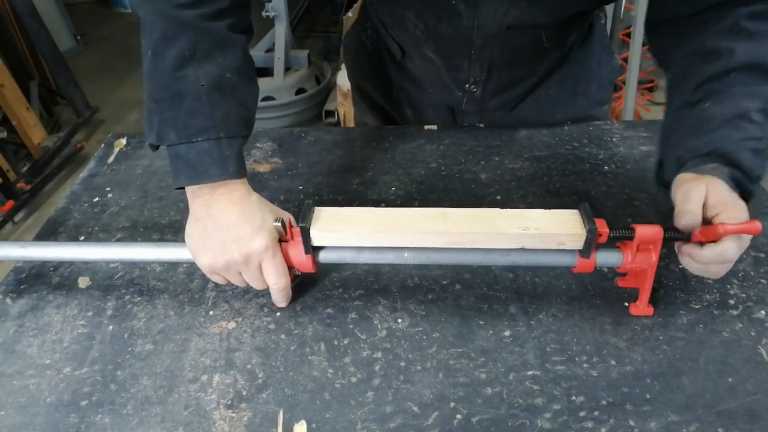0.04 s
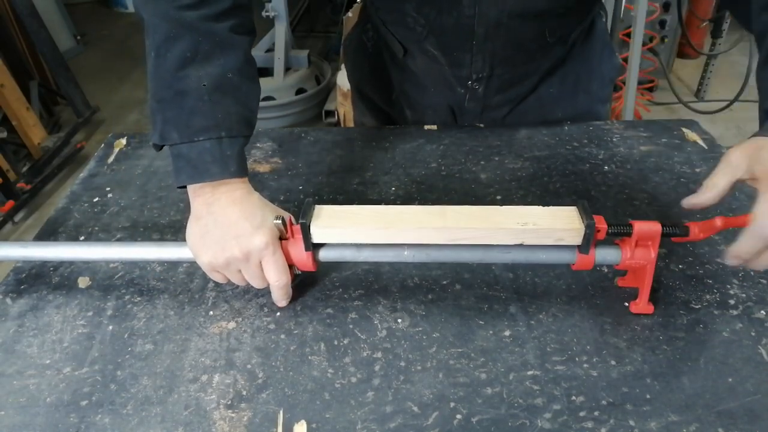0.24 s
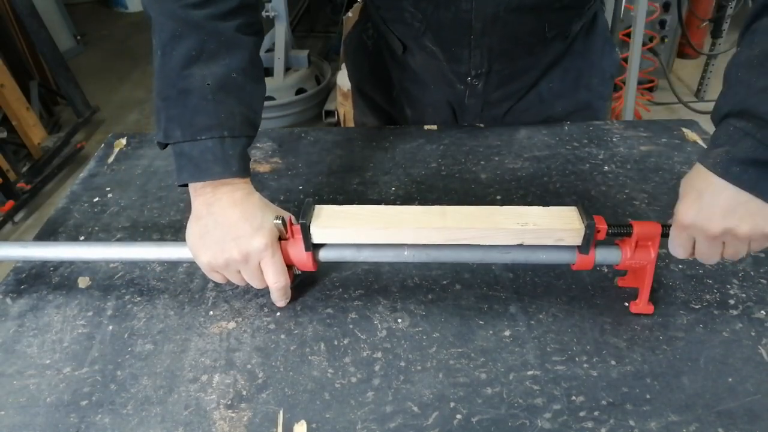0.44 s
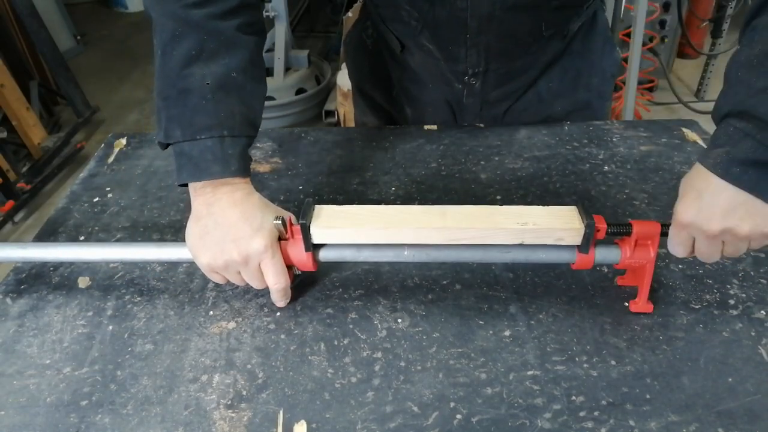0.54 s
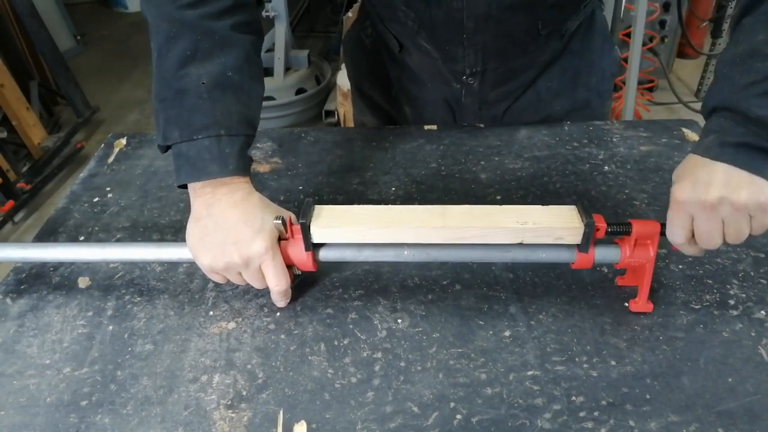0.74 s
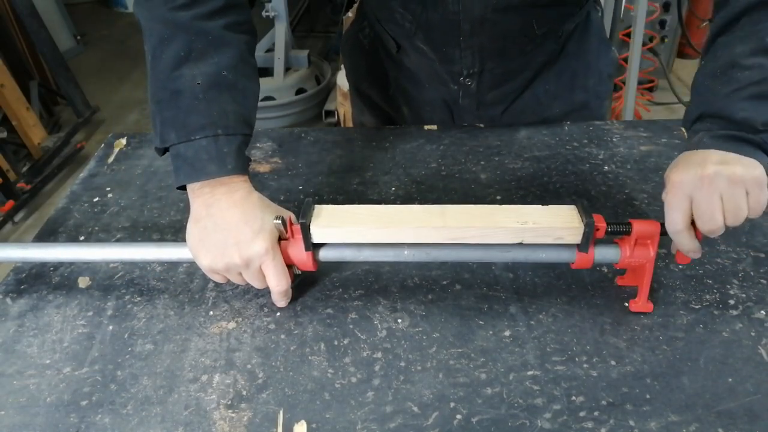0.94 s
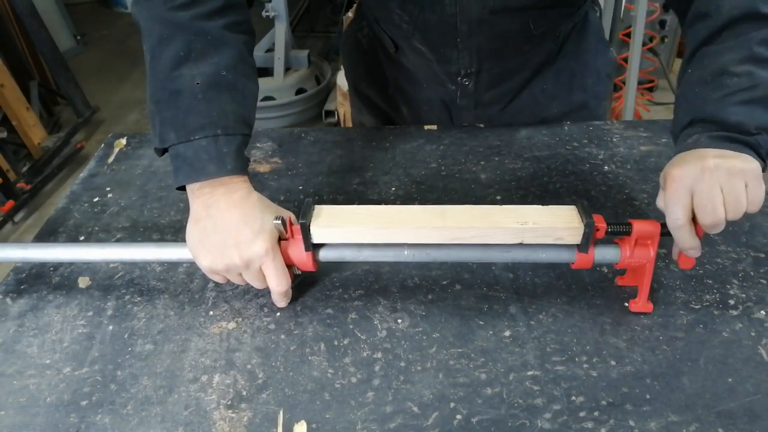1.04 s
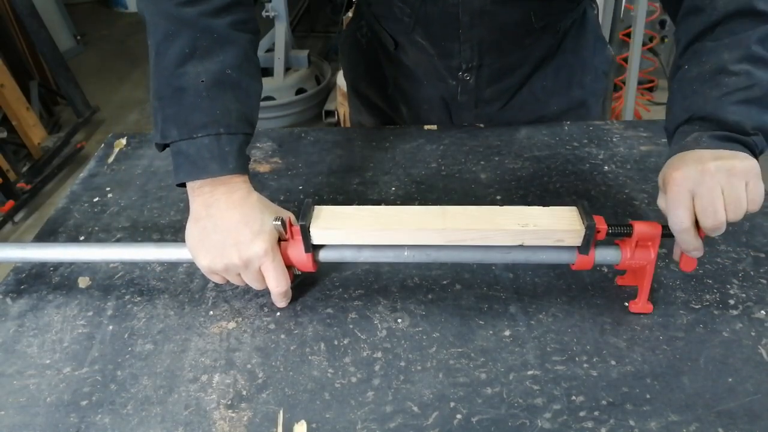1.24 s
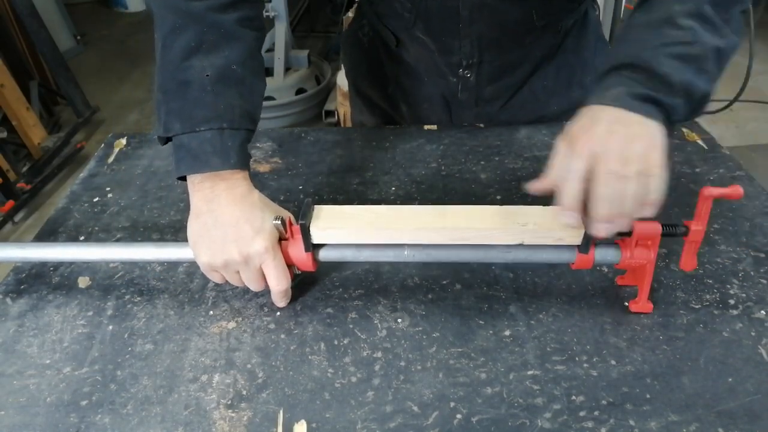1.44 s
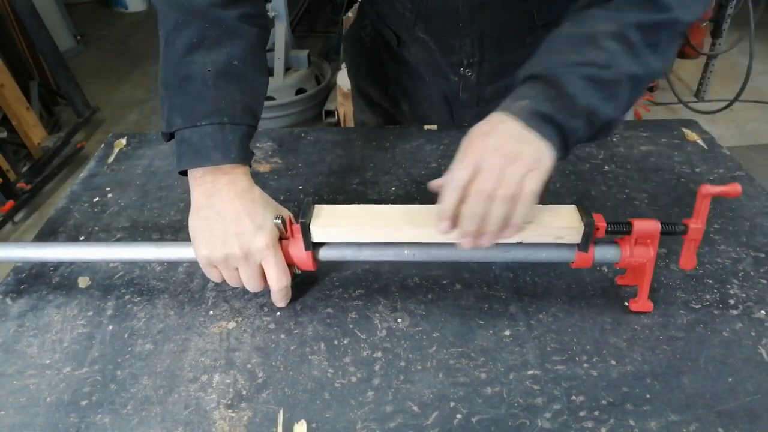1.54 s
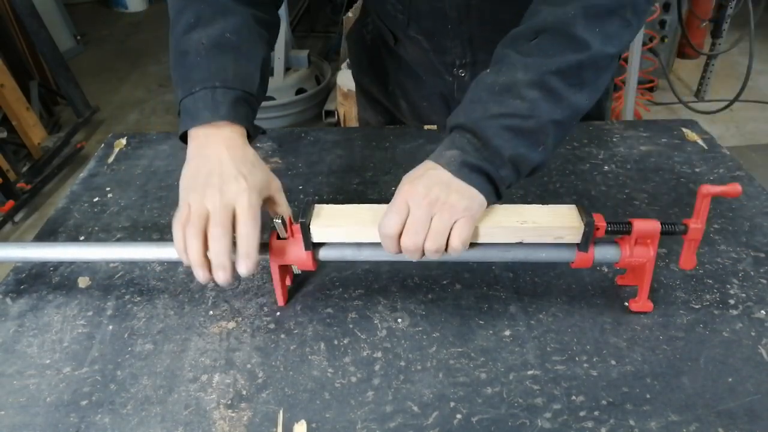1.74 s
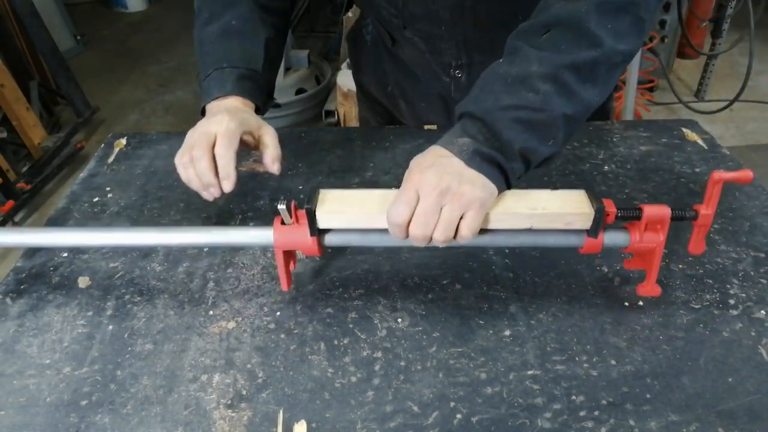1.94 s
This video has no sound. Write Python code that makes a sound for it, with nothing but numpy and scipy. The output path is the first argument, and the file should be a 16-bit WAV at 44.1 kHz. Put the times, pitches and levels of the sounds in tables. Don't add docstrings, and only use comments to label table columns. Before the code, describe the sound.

A pipe clamp rocks on a heavy workbench: one hard low clunk early, lighter rattling thuds and scraping, a quieter middle, then a second cluster of knocks; quiet workshop hum, close stereo microphone.

```python
import sys
import numpy as np
from scipy import signal
from scipy.fft import rfft, irfft, next_fast_len
from scipy.io import wavfile
from scipy.ndimage import map_coordinates

SR = 44100
rng = np.random.default_rng(int(sys.argv[2]) if len(sys.argv) > 2 else 0)


def ratio_of_db(decibels):
    return 10 ** (np.asarray(decibels, float) / 20)


def persist_wave(psi):
    counts = np.round(np.clip(psi, -1, 1) * 32767).astype(np.int16)
    wavfile.write(sys.argv[1], SR, np.atleast_2d(counts).T)


N = 88200


def unit(x):
    return x / np.sqrt(np.mean(x ** 2) + 1e-20)


def along(points, hz):
    f, v = np.transpose(points)
    return np.interp(np.log(hz + 1), np.log(f + 1), v)


def wobble(rate):
    return map_coordinates(rng.standard_normal(400), [np.arange(N) * rate / SR])


def filtered(x, response):
    m = next_fast_len(N + SR // 2)
    return irfft(rfft(x, m) * response(np.fft.rfftfreq(m, 1 / SR)), m)[..., :N]


def swells(spans, levels_db):
    t = np.arange(N) / SR
    total = 0
    for (start_s, length_s), level_db in zip(spans, levels_db):
        arch = np.sin(np.pi * np.clip((t - start_s) / length_s, 0, 1)).clip(0)
        total = total + ratio_of_db(level_db) * np.sqrt(arch)
    return total


def add_at(out, start_s, sound):
    start = round(start_s * SR)
    out[:, start:start + sound.shape[1]] += sound


# pitch_hz, likeness [-1 to 1]
DIFFUSE_LIKENESS = [(30, 1), (200, 0.72), (600, 0.36), (1500, 0), (3000, 0.067)]


def noise(gain, likeness=DIFFUSE_LIKENESS):
    def response(hz):
        angle = np.arccos(np.clip(along(likeness, hz), -1, 1)) / 2
        return gain(hz) * [np.cos(angle), np.sin(angle)]

    mid, side = filtered(rng.standard_normal((2, N)), response)
    return unit(np.array([mid + side, mid - side]))


def coloured(spectrum, likeness=DIFFUSE_LIKENESS):
    return noise(lambda hz: ratio_of_db(along(spectrum, hz)), likeness)


SCATTER_DB, DETUNE = 2, .008
SKEW_PER_KHZ = 1


def ring(modes, rise_s):
    t = np.arange(SR // 4) / SR
    hz, db, t60, pan = np.transpose(modes)[..., None]
    level, tune, skew = rng.standard_normal((3, *hz.shape))
    phase = 2 * np.pi * hz * (1 + DETUNE * tune) * t
    decay = ratio_of_db(db + SCATTER_DB * level - 60 * t / t60)
    size = decay * (1 - np.exp(-t / rise_s)) ** 2
    ears = []
    for side in (1, -1):
        offset = side * skew * SKEW_PER_KHZ * hz / 2000
        ears.append(-(size * ratio_of_db(side * pan / 2) * np.sin(phase + offset)).sum(0))
    return np.array(ears)


# start_s, level_db
BLOW_EVENTS = [
    (0.17, -42.5),
    (0.2038, -22),
    (.649, -39),
    (0.764, -33),
    (1.347, -33),
    (1.4259, -25),
    (1.5255, -33),
]
# pitch_hz, level_db, t60_s
STRUCK_SPOTS = [
    [(116, 1, .1), (211, -5.5, 0.17), (270, -0.5, 0.064), (475, -2, 0.12), (568, -2.5, .06),
     (738, 2.5, .03), (857, -22, 0.015), (1270, -10, 0.041)],
    [(127.4, 0.5, 0.13), (171.4, -4, 0.13), (215.7, -4.5, 0.17), (294.6, -2.5, 0.18), (420.5, -15.5, 0.19),
     (495, -21, 0.21), (564, -20, 0.11), (247, 5.5, .02)],
    [(136, -2, 0.15), (173, -5, 0.082), (235.6, 3.5, 0.072), (369.1, -6.5, 0.45), (481, -0.5, 0.043),
     (642, -12.5, 0.11), (680, -3, 0.029), (1230, -6, 0.018)],
    [(136.5, 1, .17), (105, -12, 0.15), (285, -4, 0.11), (294.8, -5, 0.152), (359.3, -12, .3),
     (444, -15.5, 0.14), (494, -8.5, 0.11), (650, -12.5, 0.036)],
    [(129, 8, 0.09), (293, -5.5, 0.12), (431.2, -4, 0.24), (482, -3, 0.079), (743, -16.5, 0.13),
     (772, -29, 0.13), (1166, -23, 0.19), (1106, -27, 0.29)],
    [(144, -1.5, 0.14), (222.3, -4, 0.19), (283.5, -4.5, 0.084), (435.6, -15, 0.19), (490, -7, 0.069),
     (626, -21, 0.26), (766, -11.5, 0.032), (280, 4, 0.014)],
    [(217.3, -6, 0.24), (433, -8, .18), (489, -5, 0.081), (540, -5.5, 0.046), (717, -6, .05),
     (950, -17, 0.022), (1380, -9.5, .02), (364.6, -11, 0.39)],
]
# pitch_hz, left_minus_right_db
SPOT_BALANCE = [(125, -1.5), (220, -2.5), (295, -1.5), (430, 6), (495, -1.5), (740, 1.5), (1200, 1)]
RISE_CYCLES = 0.24


def blows():
    out = np.zeros((2, N + SR))
    for (start_s, level_db), spot in zip(BLOW_EVENTS, STRUCK_SPOTS):
        hz = np.array(spot)[:, :1]
        modes = np.hstack([spot, along(SPOT_BALANCE, hz)])
        add_at(out, start_s, ratio_of_db(level_db) * ring(modes, RISE_CYCLES / hz))
    return out[:, :N]


# start_s, top_level_db, frame_level_db, clamp_level_db, block_level_db
THUD_EVENTS = [(.238, -68, -52, -38, -45), (.262, -37, -35.5, -36, -47.5), (.345, -47, -46, -46, -55.5),
               (.464, -70, -61, -64, -62.5), (.534, -47.5, -54.5, -64, -65), (.567, -44, -47, -48, -56),
               (.61, -52, -49, -74, -63), (.682, -58, -56, -60.5, -52), (.708, -40, -54, -46.5, -55),
               (.795, -57, -55, -43.5, -53.5), (.815, -54, -66, -49.5, -59), (.86, -55, -58, -54, -72),
               (.905, -57.5, -68, -51.5, -81), (.953, -55, -70, -59.5, -74), (1.050, -55, -77, -54, -69),
               (1.169, -70, -66, -68, -70), (1.2, -64, -66, -60, -66), (1.276, -66, -63, -61, -65),
               (1.319, -56, -60.5, -54, -54.5), (1.366, -42, -57, -50, -47.5),
               (1.399, -41, -51, -55, -53.5), (1.442, -35, -42.5, -46, -48.5),
               (1.474, -39.5, -45, -58, -57.5), (1.537, -35, -47.5, -50, -59),
               (1.585, -62, -50, -42, -55.5), (1.612, -48, -59, -66, -54),
               (1.652, -51, -58.5, -47.5, -55.5), (1.701, -51.5, -86, -69, -72)]
# pitch_hz, level_db, t60_s, left_minus_right_db
TOP_MODES = [(58.4, -11.5, 0.69, 6.5), (127.7, -9, 0.11, -1.5), (140.6, 3, 0.13, -1), (163, -5, 0.12, -1),
             (179.3, 5, 0.014, -4)]
FRAME_MODES = [(200, -17, 0.079, -7.5), (223.9, -0.5, 0.19, -5.5), (251.5, -6.5, 0.25, -3.5)]
CLAMP_MODES = [(264.1, -0.5, 0.14, -1.4), (291.2, -5.5, 0.071, -1.9), (347.6, -14, 0.16, -0.62),
               (290.5, -0.5, 0.021, -2.1)]
BLOCK_MODES = [(368.5, -4.5, 0.2, -0.25), (428.5, -2, 0.21, -0.52), (486.7, -1, 0.067, 2.3),
               (549.2, -9, 0.14, -1.8), (626, -10, 0.1, 0.52), (478, 6, 0.019, 0.83)]
BODY_RISES = [0.0024, 0.00057, 0.0021, 0.0009]
BODIES = (TOP_MODES, FRAME_MODES, CLAMP_MODES, BLOCK_MODES)


def thuds():
    out = np.zeros((2, N + SR))
    for start_s, *levels_db in THUD_EVENTS:
        for level_db, body, rise_s in zip(levels_db, BODIES, BODY_RISES):
            add_at(out, start_s, ratio_of_db(level_db) * ring(body, rise_s))
    return out[:, :N]


# start_s, level_db, crack_brightness_db
JAW_EVENTS = [(.1695, -54, -5.5), (.2055, -46.5, -14.5), (.219, -56, -35), (0.6501, -54, -8),
              (.7640, -53, -19), (1.319, -60.5, -16), (1.3480, -52, -11), (1.4258, -44.5, -9),
              (1.443, -46.5, -17), (1.5255, -52, -8), (1.551, -54, -6), (1.652, -53.5, -6.5)]
# pitch_hz, level_db, t60_s, left_minus_right_db
JAW_MODES = [(738.3, -4, 0.11, -8.5), (789, -15, 0.21, 2), (860, -35.5, 0.025, -6.5),
             (1053, -20, 0.31, -13), (1136, -11.5, 0.14, -2), (1346, -7, 0.039, -3.5),
             (1506, -9.5, 0.022, -4)]
# pitch_hz, level_db [per Hz]
CRACK_COLOUR = [(900, -120), (1400, 2.5), (2000, 1), (3200, -9.5), (6000, -30.5), (12000, -43.5)]
JAW_RISE_S, CRACK_T60_S = 0.00036, 0.031


def jaw_ticks():
    out, cracks, t = np.zeros((2, N + SR)), np.zeros(N), np.arange(N) / SR
    for start_s, level_db, bright_db in JAW_EVENTS:
        add_at(out, start_s, ratio_of_db(level_db) * ring(JAW_MODES, JAW_RISE_S))
        decay_db = -60 * np.abs(t - start_s) / CRACK_T60_S
        cracks += (t > start_s) * ratio_of_db(level_db + bright_db + decay_db)
    return out[:, :N] + cracks * coloured(CRACK_COLOUR, [(1000, 0.25)])


# start_s, level_db
DRAG_EFFORT = [(0, -57.5), (.15, -72), (.2, -39), (.4, -57), (.52, -70), (.55, -47.5), (.62, -55),
               (.66, -40), (.735, -52.5), (.76, -51.5), (0.818, -45.5), (.92, -71.5), (1.25, -73.5),
               (1.331, -58), (1.501, -43.5), (1.6, -46.5), (1.75, -61), (2, -78)]
DRAG_SHARES = [-1.5, -6, -4.5, -7.5, -11]
SLIPS_PER_S, SLIP_SPREAD_DB, GRIP_T60_S = 700, 2.5, .3


def drag():
    s, db = np.transpose(DRAG_EFFORT)
    effort = ratio_of_db(np.interp(np.arange(N) / SR, s, db))
    bodies, rises = [*BODIES, JAW_MODES], [*BODY_RISES, JAW_RISE_S]
    out = 0
    for place in range(3):
        chance, size = rng.random((2, N))
        slips = (chance < SLIPS_PER_S / 3 / SR) * rng.choice([-1, 1], N)
        slips = slips * ratio_of_db(-SLIP_SPREAD_DB * np.log(size + 0.00056))
        body = sum(ratio_of_db(share) * ring(modes, rise_s)
                   for share, modes, rise_s in zip(DRAG_SHARES, bodies, rises))
        body = body * ratio_of_db(-60 * np.arange(body.shape[1]) / SR / GRIP_T60_S)
        force = (unit(slips) * effort)[None]
        out = out + signal.fftconvolve(force, body, axes=1)[:, :N] / np.linalg.norm(body[0])
    return ratio_of_db(-9) * out


def bench_high_pass(x):
    corner_hz = 83.5
    return filtered(x, lambda hz: -hz ** 2 / (corner_hz ** 2 - hz ** 2 + 1.4j * hz * corner_hz))


# pitch_hz, width_hz, level_db
PALM_RESONANCES = [(2070, 530, 15), (3820, 330, -2), (5800, 170, 0), (6970, 180, -7), (7300, 230, 2),
                   (8140, 420, 3), (10100, 780, -11), (11800, 610, -9)]
# start_s, length_s
PALM_STROKES = [
    (1.635, .08),
    (1.70, .065),
    (1.755, .05),
]
PALM_LEVELS = [-66, -70, -68.5]


def palm():
    def response(f):
        return sum(ratio_of_db(db) * width / np.hypot(width, 2 * (f - hz)) for hz, width, db in PALM_RESONANCES)

    return swells(PALM_STROKES, PALM_LEVELS) * ratio_of_db(1.4 * wobble(90)) * noise(response)


# pitch_hz, level_db [per Hz]
CLOTH_COLOUR = [(600, -120), (900, -0.5), (2000, 2), (4000, -7.5), (8000, -14), (12000, -37.5),
                (16000, -47.5)]
# start_s, length_s
SLEEVE_MOVES = [(.18, .3), (.53, .07), (.62, .16), (.9, .24), (1.33, .07), (1.42, .025), (1.5, .1),
                (1.8, .18)]
SLEEVE_LEVELS = [-68, -67.5, -69, -78.5, -68, -82, -73.5, -72]


def sleeves():
    return swells(SLEEVE_MOVES, SLEEVE_LEVELS) * ratio_of_db(1.2 * wobble(60)) * coloured(CLOTH_COLOUR)


# start_s, length_s, pitch_hz, level_db
SQUEAK_EVENTS = [(.54, .045, 5230, -75), (1.35, .045, 5650, -81), (1.235, .03, 5800, -85),
                 (.805, .07, 1071, -72), (.675, .03, 1130, -66), (1.645, .065, 4030, -79),
                 (1.695, .075, 4160, -79), (1.76, .04, 3700, -80), (1.635, .045, 6960, -80),
                 (1.65, .05, 7750, -79), (.175, .075, 4500, -84), (1.715, .06, 7870, -83),
                 (1.76, .035, 7020, -80), (1.635, .05, 12000, -86), (1.665, .05, 1470, -72)]


def squeaks():
    waver, flutter_db = .004, 2.5
    out = 0
    for start_s, length_s, hz, level_db in SQUEAK_EVENTS:
        phase = 2 * np.pi * np.cumsum(hz * (1 + waver * wobble(90))) / SR
        ears = []
        for ear in range(2):
            tone = np.sin(phase + 2 * np.pi * rng.random() + wobble(40))
            ears.append(ratio_of_db(flutter_db * wobble(190)) * tone)
        out = out + np.sqrt(2) * swells([(start_s, length_s)], [level_db]) * np.array(ears)
    return out


# pitch_hz, t60_s
ROOM_DECAY = [(100, 0.22), (1000, 0.65), (8000, 0.18)]
# pitch_hz, likeness [-1 to 1]
ROOM_LIKENESS = [(100, 0.84), (300, 0.39), (1000, 0.054), (3000, 0.0044)]
ROOM_DB, ROOM_LOW_HZ = -8, 450


def walls(bench):
    x = filtered(bench.mean(0), lambda hz: hz / np.hypot(hz, ROOM_LOW_HZ))
    diffuse = noise(lambda f: 1 + 0 * f, ROOM_LIKENESS)[:, :SR // 2]
    hz, t, z = signal.stft(diffuse, SR, nperseg=256)
    fade = ratio_of_db(-60 * t / along(ROOM_DECAY, hz)[:, None])
    tail = signal.istft(z * fade, SR, nperseg=256)[1]
    tail = tail / np.linalg.norm(tail[0])
    delayed = np.pad(x, (300, 0))[None]
    return ratio_of_db(ROOM_DB) * signal.fftconvolve(delayed, tail, axes=1)[:, :N]


# pitch_hz, level_db [per Hz]
AIR_COLOUR = [(53, -35), (90, 0), (411, -13), (448, -8.5), (488, -13), (673, -13.5), (782, -17.5),
              (1420, -17), (15000, -39.5)]


def air():
    return ratio_of_db(-65.5 + 0.2 * wobble(26)) * coloured(AIR_COLOUR)


# pitch_hz, level_db [per Hz]
RUMBLE_COLOUR = [(8.8, -8), (15, -1), (65, 1), (81, -18), (100, 0), (130, -45), (220, -120)]
# start_s, level_db
RUMBLE_COURSE = [(0, -62), (.35, -62), (.7, -58.5), (1.0, -62.5), (1.2, -66.5), (1.45, -58), (2, -62.5)]


def rumble():
    s, db = np.transpose(RUMBLE_COURSE)
    swell_db = np.interp(np.arange(N) / SR, s, db - db.mean())
    return ratio_of_db(-61.5 + swell_db + 0.67 * wobble(11.0)) * coloured(RUMBLE_COLOUR)


# pitch_hz, left_minus_right_db
STEREO_TILT = [(100, 2), (4000, -1.7), (8000, -4), (13000, 4.5)]


def scene():
    bench = bench_high_pass(blows() + thuds() + jaw_ticks() + drag())
    around = palm() + sleeves() + squeaks() + air() + rumble()
    around = filtered(around, lambda hz: ratio_of_db(along(STEREO_TILT, hz) * np.array([[.5], [-.5]])))
    return bench + walls(bench) + around


def top_cut(x):
    return signal.sosfilt(signal.butter(12, 15150, fs=SR, output="sos"), x)


def record(dry):
    top_hz = 15140
    mix = filtered(dry, lambda hz: hz < top_hz)
    return top_cut(mix)


dry = scene()
out = record(dry)
persist_wave(out)
```